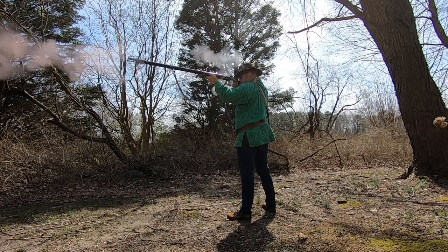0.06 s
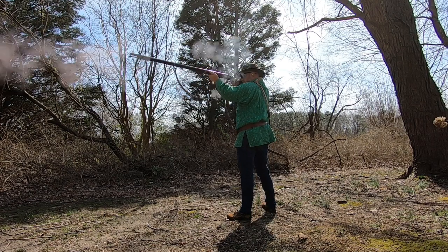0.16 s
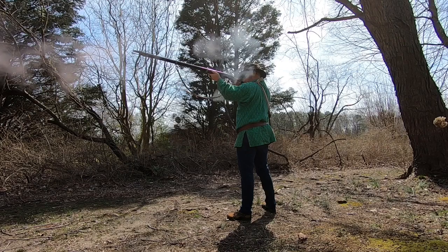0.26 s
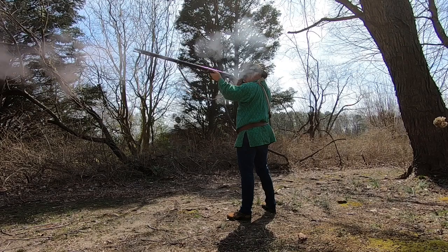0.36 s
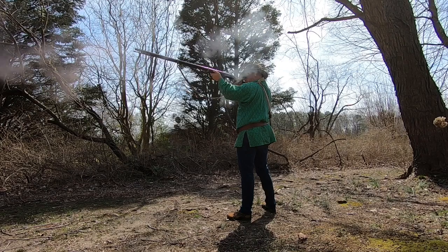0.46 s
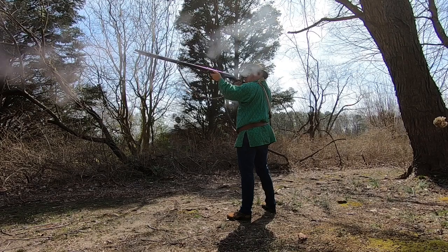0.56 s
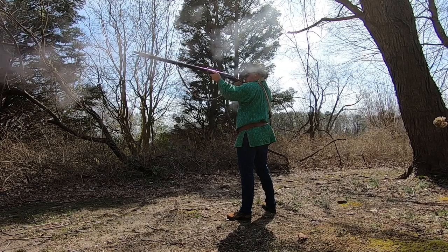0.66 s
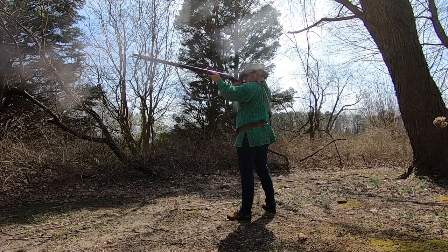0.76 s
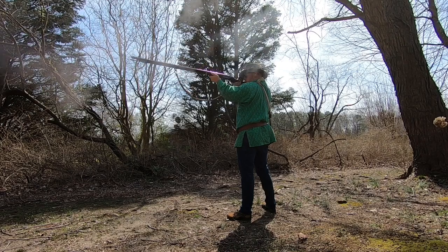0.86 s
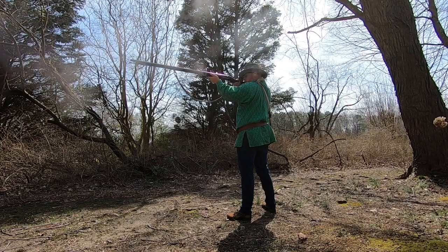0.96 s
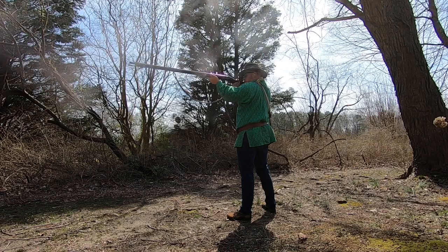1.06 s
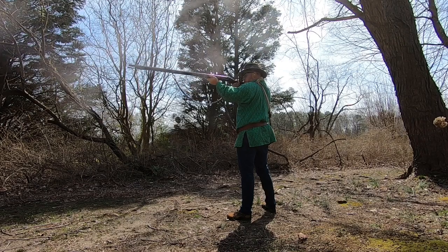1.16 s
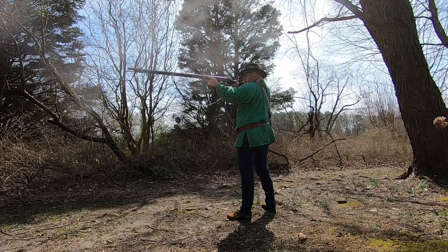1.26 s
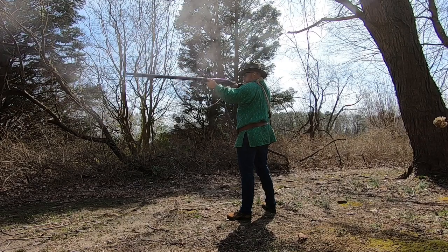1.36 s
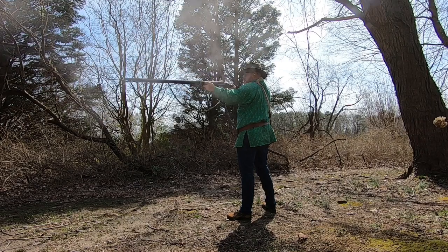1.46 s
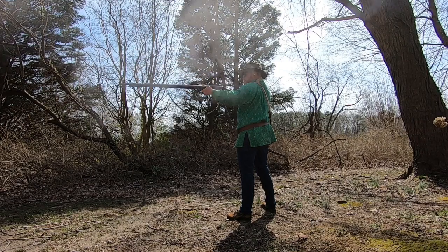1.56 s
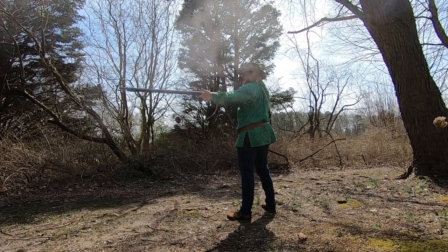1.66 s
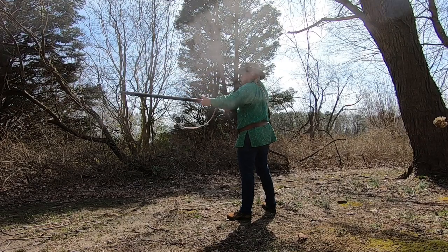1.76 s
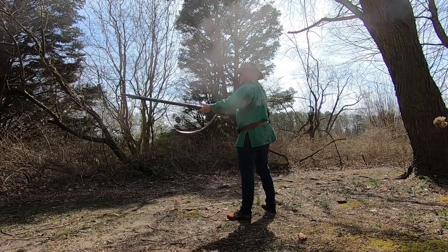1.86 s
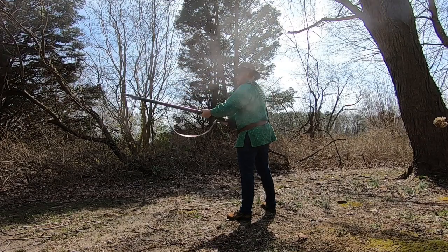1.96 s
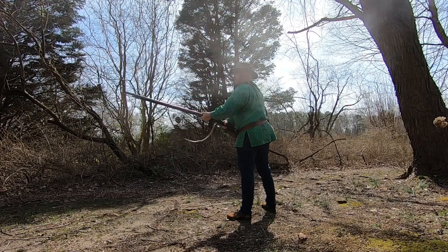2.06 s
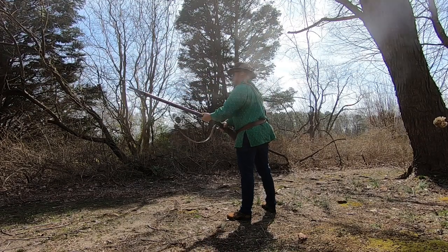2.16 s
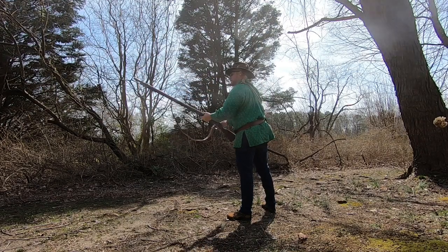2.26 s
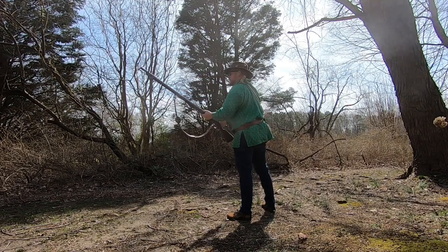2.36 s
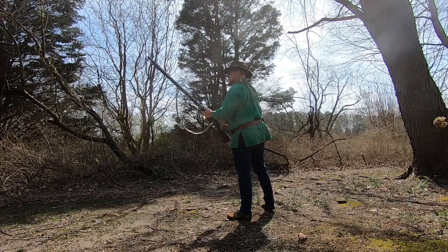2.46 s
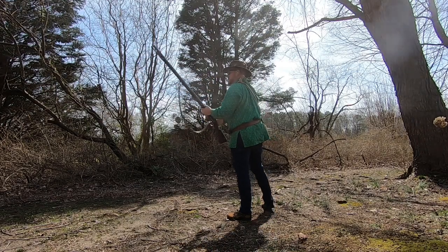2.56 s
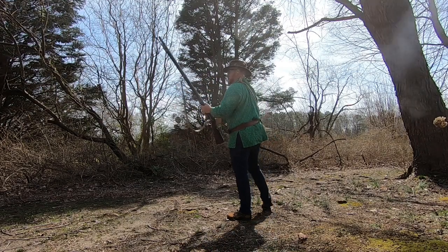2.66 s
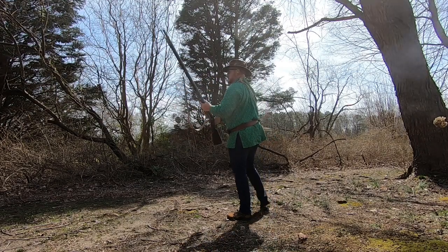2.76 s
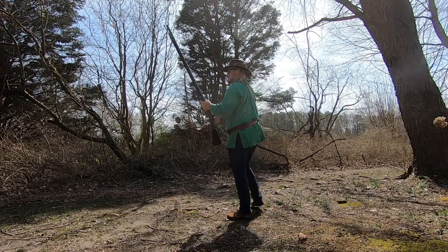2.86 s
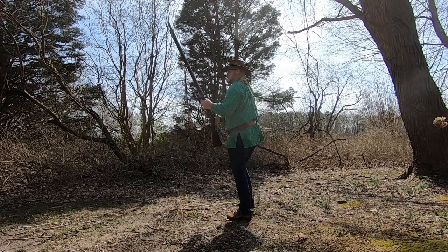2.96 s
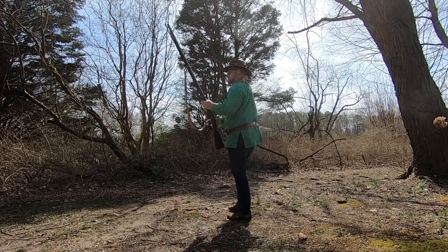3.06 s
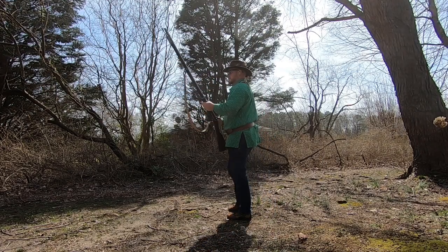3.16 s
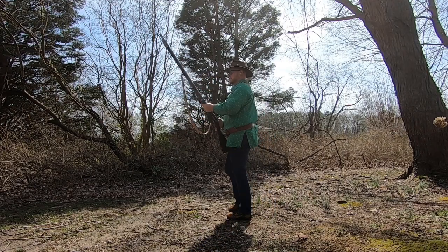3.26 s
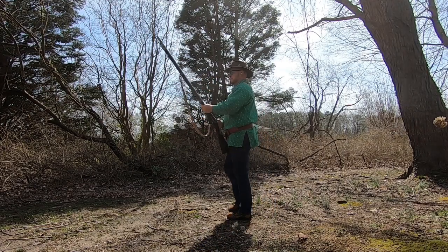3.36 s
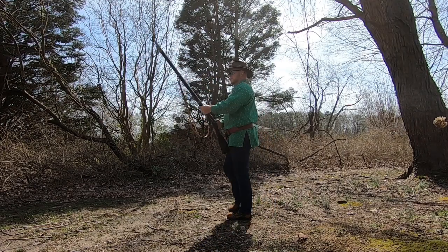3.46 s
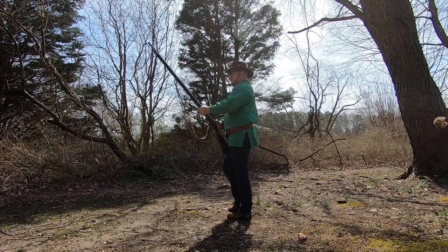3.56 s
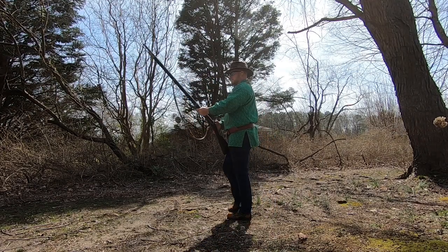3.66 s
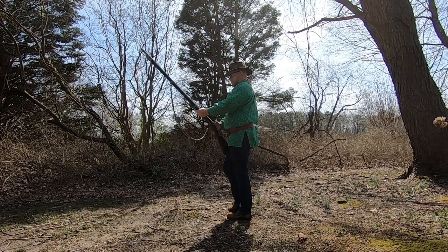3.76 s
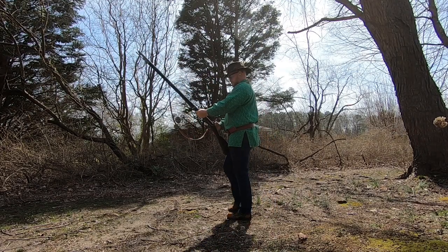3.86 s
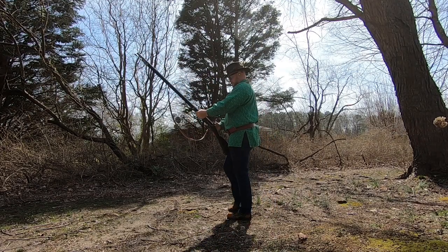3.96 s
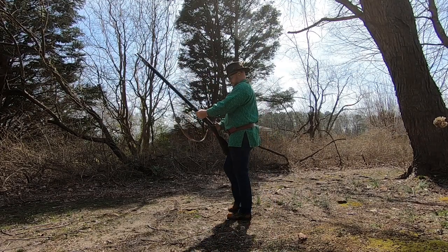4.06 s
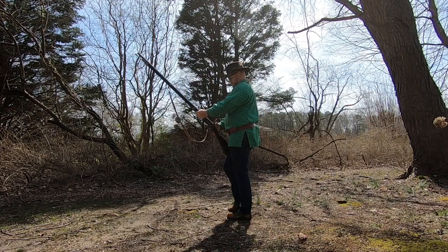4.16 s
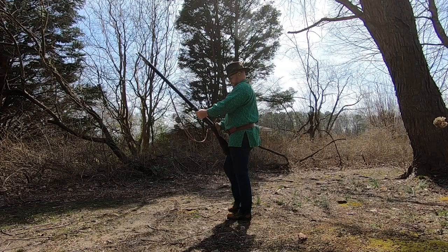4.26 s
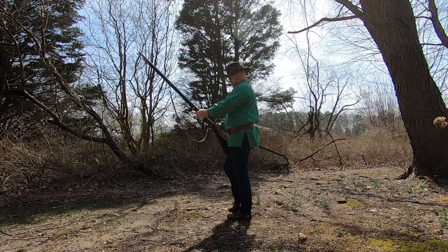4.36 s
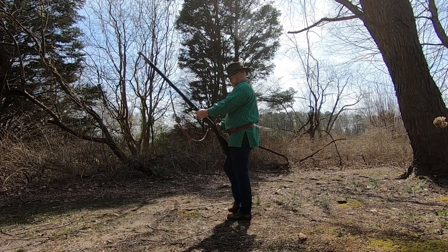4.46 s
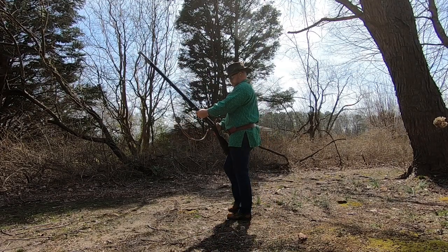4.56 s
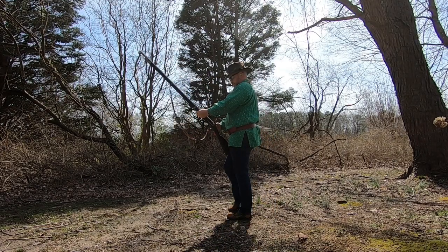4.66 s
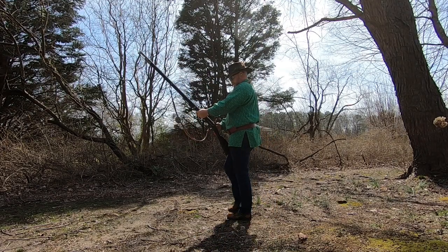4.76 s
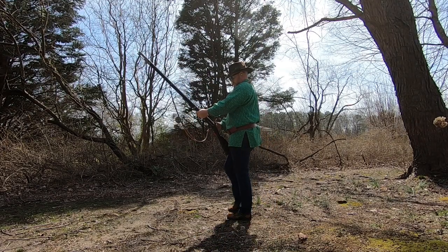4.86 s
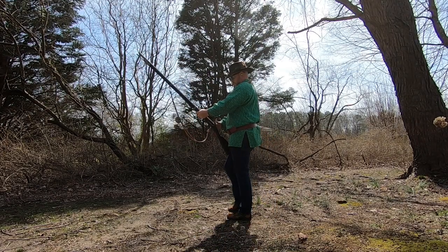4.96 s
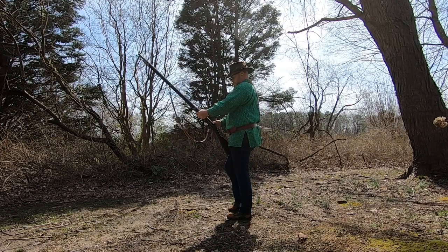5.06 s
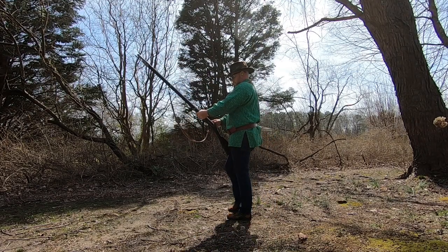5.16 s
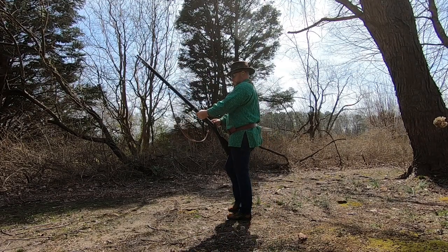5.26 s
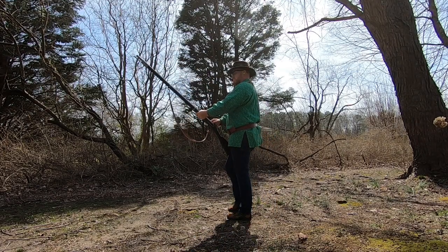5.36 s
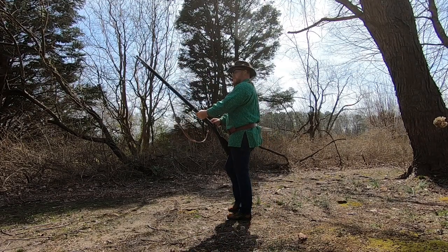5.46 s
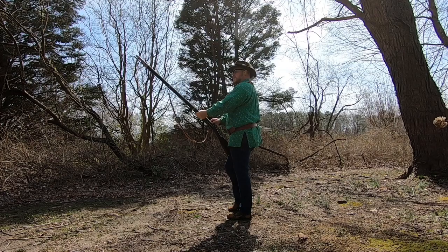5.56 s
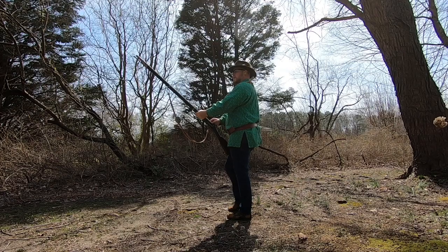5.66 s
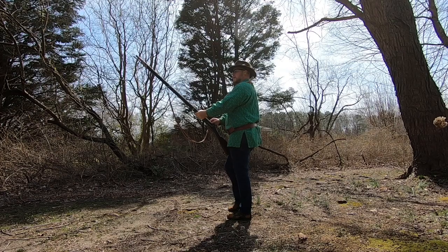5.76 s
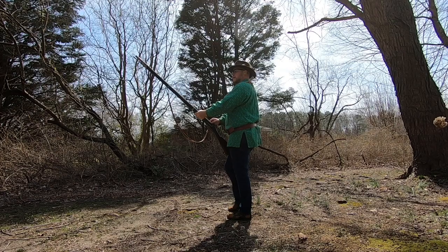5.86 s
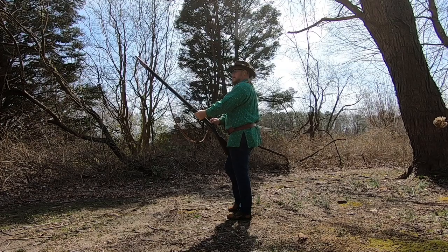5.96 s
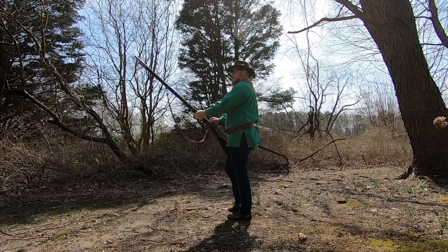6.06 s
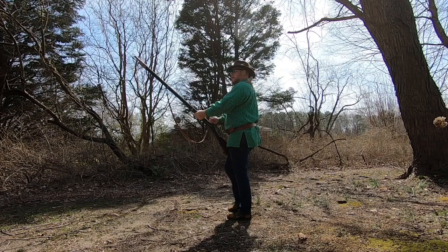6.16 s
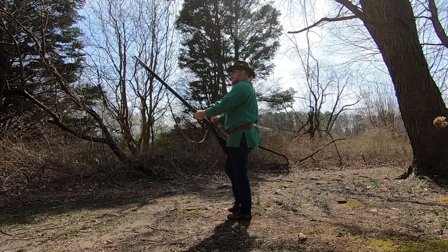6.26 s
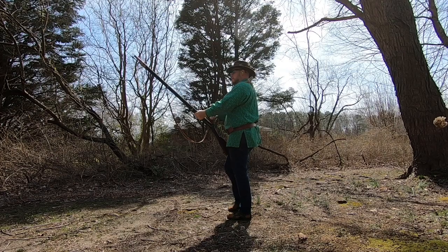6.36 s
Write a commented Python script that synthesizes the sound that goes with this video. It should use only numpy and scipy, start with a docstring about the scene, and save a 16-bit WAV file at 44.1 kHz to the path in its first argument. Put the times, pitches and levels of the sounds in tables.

```python
"""A black-powder musket fires at the edge of a wood; a sharp crack follows just after the shot.
Trunks scatter the blast back, ever duller; the camera's gain ducks and creeps back, swelling the far echo.
The gun rattles as it is lowered, its stock is knocked at 1.8 s, its steel lock snaps at 4.4 s.
Wind, rumbling on the microphone throughout, buffets hard at 4.9 s; a faint far tone follows."""
import sys
import numpy as np
from scipy import signal
from scipy.fft import rfft, irfft, next_fast_len
from scipy.io import wavfile
from scipy.ndimage import uniform_filter1d, minimum_filter1d, map_coordinates

SR = 44100
rng = np.random.default_rng(int(sys.argv[2]) if len(sys.argv) > 2 else 0)


def wrap_up_sound(samples):
    """Save the sound to the file named by the first command line argument, as 16-bit audio."""
    columns = np.atleast_2d(samples).T
    # keep every value between -1 and 1, then stretch to whole-number steps
    tamed = np.clip(columns, -1, 1)
    steps = np.round(tamed * 32767).astype(np.int16)
    wavfile.write(sys.argv[1], SR, steps)


N = 282240

# spectrum of wind thuds on the microphone: freq_hz, density_db
THUD_SPECTRUM = [(20, -29), (50, 5), (80, 11), (125, 3.5), (170, -11), (260, -21.5), (400, -38.5),
                 (900, -71.5)]


def amp(db):
    return 10 ** (np.asarray(db) / 20)


def unit(x):
    """x at rms 1."""
    return x / np.sqrt(np.mean(x ** 2) + 1e-20)


def along(points, hz):
    """Interpolate (freq_hz, value) points on a log axis."""
    freqs_hz, values = np.transpose(points)
    return np.interp(np.log(hz + 1), np.log(freqs_hz + 1), values)


def since(start_s):
    """Seconds after start_s, zero before."""
    return np.maximum(np.arange(N) / SR - start_s, 0)


def filtered(x, response):
    """Filter x by the gain response(hz)."""
    n = x.shape[-1]
    size = next_fast_len(n + SR // 4)
    return irfft(rfft(x, size) * response(np.fft.rfftfreq(size, 1 / SR)), size)[..., :n]


def noise(spectrum):
    """Coloured noise at rms 1."""
    return unit(filtered(rng.standard_normal(N), lambda hz: amp(along(spectrum, hz))))


def running_rms(x, window_s):
    """Level in a sliding window."""
    return np.sqrt(np.abs(uniform_filter1d(x ** 2, max(int(window_s * SR), 1))) + 1e-14)


def ring(modes, t):
    """Decaying partials of a struck part."""
    return sum(amp(db - 60 * t / t60_s) * np.sin(2 * np.pi * hz * t) for hz, db, t60_s in modes)


def hush(level_db=-55):
    """Steady distant air and hiss."""
    # background spectrum: freq_hz, density_db
    spectrum = [(88, -27), (150, 11.5), (315, 1.5), (361, 1.5), (575, -1.5), (610, 2), (741, -1),
                (817, -2.5), (2790, -12), (4910, -13.5), (15800, -16)]
    return amp(level_db) * noise(spectrum)


def far_tone(peak_s=5.105, pitch_hz=412, level_db=-55, width_s=0.083):
    """A faint, short hollow tone in the distance."""
    t = np.arange(N) / SR - peak_s
    return amp(level_db) * np.exp(-(t / width_s) ** 2) * np.sin(2 * np.pi * pitch_hz * t)


def eddies(spectrum, window_s):
    """Turbulence with eddies of about equal strength."""
    turbulence = noise(spectrum)
    return turbulence / running_rms(turbulence, window_s)


def wind(flutter_db=2.5, flutter_hz=15, gust_width_s=0.037, strong_db=-24, thud_max_db=-41):
    """Eddies flutter on the microphone; stronger wind reaches higher in frequency."""
    # wind strength: time_s, level_db
    strength = [(1.1, -31), (1.26, -32.5), (2.52, -30.5), (2.53, -24), (2.66, -37), (3.03, -32),
                (3.06, -46), (3.14, -29.5), (3.19, -39), (3.48, -30.5), (3.92, -37.5), (4.08, -23),
                (4.46, -28), (4.52, -22.5), (4.67, -36.5), (5.01, -15), (5.14, -37), (5.78, -32),
                (5.94, -41.5), (6.4, -35.5)]
    # short gusts on top: peak_s, lift_db
    gusts = [(1.21, 6.5), (2.32, 7.5), (2.43, 6.5), (4.28, 7.5), (4.78, 7.5)]
    # low rumble: freq_hz, density_db
    rumble_spectrum = [(10, 4), (25, 7), (45, 2.5), (75, -8), (105, -17.5), (150, -35), (250, -50),
                       (600, -105)]
    t = np.arange(N) / SR
    gusts_db = sum(db * np.exp(-((t - peak_s) / gust_width_s) ** 2) for peak_s, db in gusts)
    flutter = map_coordinates(rng.standard_normal(N // 100), [t * flutter_hz])  # smooth random curve
    strength_db = np.interp(t, *np.transpose(strength)) + gusts_db + flutter_db * flutter
    thud_db = thud_max_db + 1.5 * np.minimum(strength_db - strong_db, 0)
    thuds = amp(thud_db) * noise(THUD_SPECTRUM)
    return amp(strength_db) * eddies(rumble_spectrum, window_s=0.15) + thuds


def buffet(start_s=4.9, level_db=-19.5, attack_s=0.034, hold_s=0.079, t60_s=0.12):
    """One hard buffet of wind thuds above the rumble."""
    attack = np.minimum(since(start_s) / attack_s, 1)
    decay = amp(level_db - 60 * since(start_s + attack_s + hold_s) / t60_s)
    return attack * decay * eddies(THUD_SPECTRUM, window_s=0.0164)


def near_trees(sound, level_db=-11.5, rise_s=0.02, tail_s=0.6):
    """The nearest trunks scatter a small sound into a tail that swells, then fades band by band."""
    # decay among the trunks: freq_hz, t60_s
    decay = [(300, 0.66), (2700, 0.48), (5000, 0.35), (9000, 0.27), (15000, 0.17)]
    # reflection off bark: freq_hz, gain_db
    bark = [(300, 6), (1200, -5), (2700, -0.5), (4800, -5), (7000, -11), (10000, -8), (15000, -5)]
    hz, t, spectra = signal.stft(sound, SR, nperseg=128)
    lag_s = t[t < tail_s]
    tail_power = amp(-120 * lag_s / along(decay, hz)[:, None]) * (1 - np.exp(-(lag_s / rise_s) ** 4))
    tail_power /= tail_power.sum(axis=1, keepdims=True)
    power = signal.fftconvolve(np.abs(spectra) ** 2, tail_power, axes=1)[:, :len(t)]
    scatter = signal.stft(rng.standard_normal(N), SR, nperseg=128)[2]
    returned = scatter / scatter.std() * np.sqrt(np.abs(power)) * amp(along(bark, hz))[:, None]
    return amp(level_db) * signal.istft(returned, SR, nperseg=128)[1][:N]


def gun_colour(force, centre_hz, width_oct, body_db=-11, top_hz=14300):
    """A force coloured by a band-pass and the gun's resonances, at rms 1."""
    # short resonances of the gun: freq_hz, width_hz, gain_db
    modes = [(825, 260, 6), (1417, 160, 1.5), (1890, 230, 3), (2630, 330, -2), (3470, 315, -9),
             (4330, 620, -7), (4980, 400, -7), (7500, 350, -12), (8180, 270, -2), (9100, 280, 2),
             (9850, 290, -3.5), (12050, 120, -4), (12380, 300, -11), (15000, 750, -1)]

    def response(hz):
        resonances = sum(amp(db) * 1j * hz * width_hz / (mode_hz ** 2 - hz ** 2 + 1j * hz * width_hz)
                         for mode_hz, width_hz, db in modes)
        band = 1 / (1 + (np.log2((hz + 1) / centre_hz) / width_oct) ** 4 / 2)
        return (amp(body_db) + resonances) * band / (1 + (hz / top_hz) ** 20)

    return unit(filtered(force, response))


def scrape(peak_s=3.016, level_db=-53, width_s=0.038):
    """The gun rubs briefly as the grip changes."""
    stroke = np.exp(-((np.arange(N) / SR - peak_s) / width_s) ** 2)
    return amp(level_db) * stroke * gun_colour(rng.standard_normal(N), centre_hz=1250, width_oct=0.53)


def stock_knock(start_s=1.7826, gain_db=-30):
    """The wooden stock is knocked as the gun comes down."""
    # stock modes: freq_hz, level_db, t60_s
    modes = [(430, -0.5, 0.081), (820, 2.5, 0.067), (1470, 0, 0.052), (1900, -8, 0.044), (2840, -3, .06),
             (3430, -12.5, 0.29)]
    return amp(gain_db) * ring(modes, since(start_s))


def crack_and_clicks(light_t60_s=0.035, light_db=-43.5, halving_db=31.5, blow_gain=0.35):
    """Each is a sharp blow and a brief chatter: the harder, the shorter."""
    # a sharp crack just after the shot, then clicks of lock, sling and stock:
    # start_s, strength_db, centre_hz, width_oct
    events = [(0.1105, 11, 4870, 0.44), (.738, -52, 5500, .5), (0.8237, -37.5, 7050, 0.6),
              (.834, -42.5, 7000, 0.34), (.8695, -43.5, 7600, .5), (1.7826, -21, 1600, 0.89),
              (1.789, -40, 7550, 0.5), (1.7957, -25, 3170, 1), (1.812, -41, 5950, 1.3),
              (1.836, -43, 5970, 0.54), (1.866, -41.5, 5970, 1.1), (1.884, -35, 5200, 1.04),
              (2.985, -50.5, 4000, 0.78), (3.2422, -39, 2800, 1.9), (3.255, -45, 3500, 1.2),
              (3.2667, -40.5, 3860, 1.6), (3.478, -51, 3288, .6), (3.490, -39, 5100, 1.4),
              (4.4038, -32, 3500, 1.1), (4.4065, -19.5, 5500, 0.77), (4.4084, -6.5, 9460, 1.07),
              (4.4107, -10.5, 3780, 0.99), (4.417, -26, 9000, 0.97), (4.528, -47.5, 8000, 1.2),
              (4.541, -42, 2080, 0.15), (5.6256, -53.5, 2620, 0.71)]
    out = np.zeros(N + SR)
    t = np.arange(SR // 3) / SR
    blow = blow_gain * unit(signal.unit_impulse(len(t), 20))
    for start_s, strength_db, centre_hz, width_oct in events:
        t60_s = light_t60_s * 0.5 ** (max(strength_db - light_db, 0) / halving_db)
        fade = amp(-60 * t / t60_s)
        chatter = unit(rng.standard_normal(len(t)) * fade)
        click = gun_colour(blow + chatter, centre_hz, width_oct) * np.sqrt(np.mean(fade ** 2))
        out[round(start_s * SR):][:len(t)] += amp(strength_db) * click
    return out[:N]


def steel(snap_s=4.4108, lock_gain_db=-27):
    """A small steel part jingles as the gun moves; the lock rings when it snaps."""
    # mode of the small part: freq_hz, level_db, t60_s
    part_modes = [(9405, -2, 0.2)]
    # jolts to that part: start_s, gain_db
    jolts = [(.834, -48), (3.2427, -56)]
    # lock modes: freq_hz, level_db, t60_s
    lock_modes = [(1950, -2.5, 0.038), (1980, -22, 0.18), (2770, -24.5, 0.44), (9000, -9, 0.039),
                  (12016, -2, 0.23), (12040, 17, .035)]
    jingles = sum(amp(db) * ring(part_modes, since(start_s)) for start_s, db in jolts)
    return jingles + amp(lock_gain_db) * ring(lock_modes, since(snap_s))


def swells(echoes):
    """Envelope of echoes that each rise to a peak and die away; powers add."""
    t = np.arange(N) / SR
    power = np.zeros(N)
    for peak_s, level_db, rise_s, t60_s in echoes:
        rise = np.exp(-(np.minimum(t - peak_s, 0) / rise_s) ** 2)
        power += (rise * amp(level_db - 60 * since(peak_s) / t60_s)) ** 2
    return np.sqrt(power)


def far_booms():
    """Far tree lines return the blast as dull booms."""
    # returns from the tree lines: peak_s, level_db, rise_s, t60_s
    booms = [(.8, -26.5, 0.15, 0.82), (1.7, -46.5, 0.59, 5.47)]
    # boom spectrum: freq_hz, density_db
    spectrum = [(30, -11), (100, 3.5), (175, 3), (300, -0.5), (480, -10.5), (800, -7), (2000, -50),
                (5000, -87)]
    return swells(booms) * noise(spectrum)


def near_echo(start_s=0.02401, level_db=26, pitch_hz=430, t60_s=0.011):
    """One close reflector returns the blast as a low slap."""
    return -ring([(pitch_hz, level_db, t60_s)], since(start_s))


def blast_colour(hz):
    """Gain of the broad blast spectrum with its narrow ripple."""
    # blast spectrum: freq_hz, density_db
    spectrum = [(20, -9.5), (60, -5), (140, -1), (240, -2.5), (330, 0), (460, 0), (680, -5), (900, -12),
                (1150, -7), (1850, -7), (2600, -10.5), (5000, -13.5), (7500, -15.5), (11000, -18),
                (16000, -24.5)]
    # peaks and dips in the echoes: centre_hz, width_hz, gain_db
    ripple = [(1090, 110, 3), (1820, 130, 0.5), (2175, 130, -4), (2380, 110, 4), (2740, 66, -3),
              (2890, 110, 3.5), (5350, 120, 3)]
    ripple_db = sum(db * np.exp(-((hz - centre_hz) / width_hz) ** 2) for centre_hz, width_hz, db in ripple)
    return amp(along(spectrum, hz) + ripple_db)


def scattered_blast(crack_depth=0.44, crack_decay_s=0.11):
    """Countless echoes of one blast; the later they come, the more treble the air has taken."""
    # air absorption: freq_hz, loss_db_per_s
    air = [(300, -2), (1000, -1), (2000, 3.5), (3500, 18), (6000, 49.5), (10000, 68), (16000, 98)]
    # returns from near trunks, the wood behind, the far forest: peak_s, level_db, rise_s, t60_s
    echoes = [(.015, 11.5, .1, 0.71), (.2, -5.5, 0.11, 1.71), (1.58, -37.5, 0.61, 5.2)]
    t = np.arange(N) / SR
    trunks = np.repeat(rng.standard_normal(N), repeats=16)[:N]
    cracks = np.exp(crack_depth * trunks * np.exp(-t / crack_decay_s))  # early echoes stand apart
    scatter = unit(filtered(cracks * rng.standard_normal(N), blast_colour))
    scatter /= running_rms(scatter, window_s=0.017)
    hz, travel_s, spectra = signal.stft(scatter, SR, nperseg=512)
    loss_db = along(air, hz)[:, None] * travel_s
    roll = signal.istft(spectra * amp(-loss_db), SR, nperseg=512)[1][:N]
    return roll * swells(echoes)


def pressure_swing(level_db=14, suction_s=0.077):
    """Slow suction and rebound behind the blast's pressure front."""
    progress = np.arange(N) / SR / suction_s
    return -amp(level_db) * (1 - progress) * np.exp(-progress)


def scene():
    """Shot, crack, handling and background, alike in both channels."""
    short_sounds = crack_and_clicks() + steel() + stock_knock() + scrape()
    shot = scattered_blast() + far_booms() + pressure_swing() + near_echo()
    mono = shot + short_sounds + near_trees(short_sounds) + wind() + buffet() + far_tone() + hush()
    return np.array([mono, mono])


def auto_gain(x, ceiling_db=-15, hold_s=0.46, recovery_per_s=0.79, low_cut_hz=200):
    """The gain drops at once for a loud sound, holds, then climbs back linearly."""
    sensed = filtered(x, lambda hz: hz ** 2 / (hz ** 2 + low_cut_hz ** 2))
    needed = np.minimum(1, amp(ceiling_db) / running_rms(sensed, window_s=0.06))
    half = int(hold_s * SR / 2)
    held = minimum_filter1d(needed, 2 * half + 1, origin=half - SR // 50, mode="nearest")  # 20 ms ahead
    climb = recovery_per_s * np.arange(N) / SR
    return np.minimum.accumulate(held - climb) + climb


def record(dry, top_hz=15900):
    """The camera's gain control, full-scale clipping and band limit."""
    clipped = np.clip(dry * auto_gain(dry[0]), -1, 1)
    return filtered(clipped, lambda hz: 1 / np.sqrt(1 + (hz / top_hz) ** 300))


dry = scene()
out = record(dry)
wrap_up_sound(out)
```